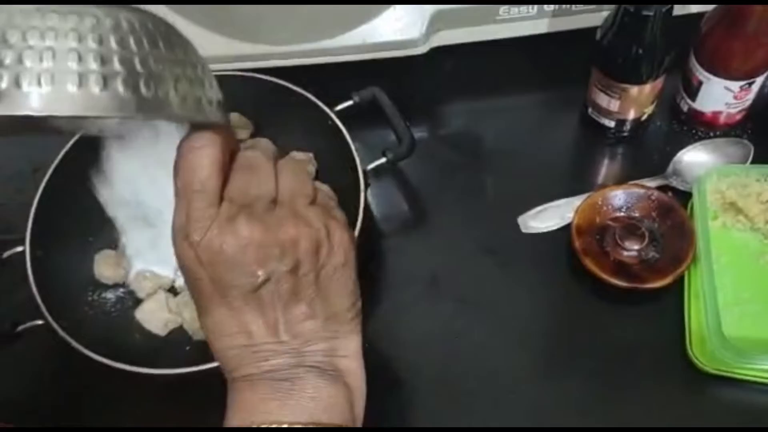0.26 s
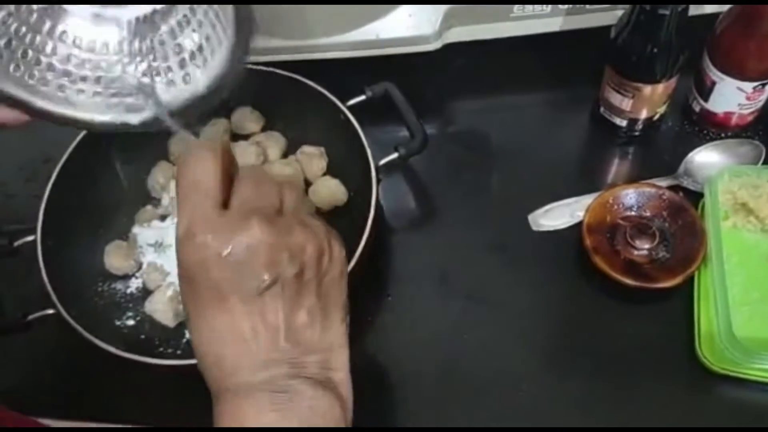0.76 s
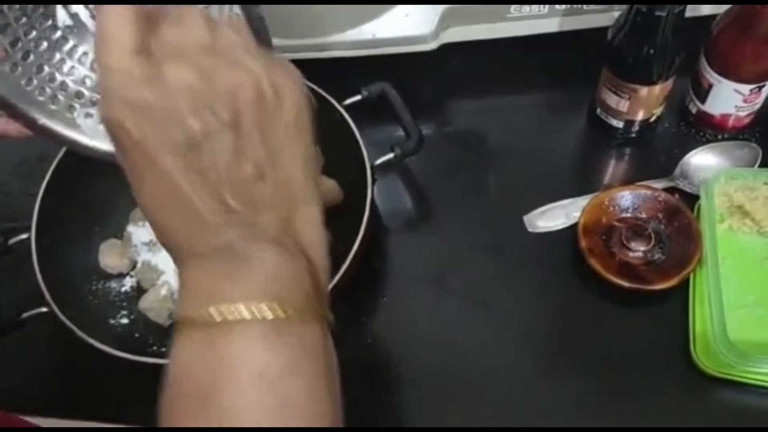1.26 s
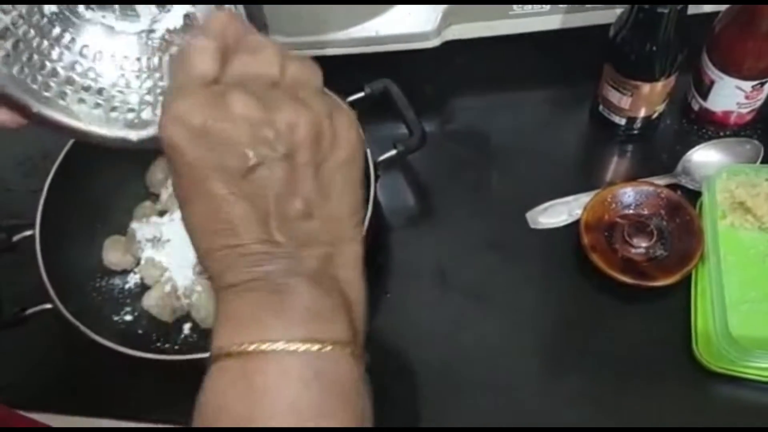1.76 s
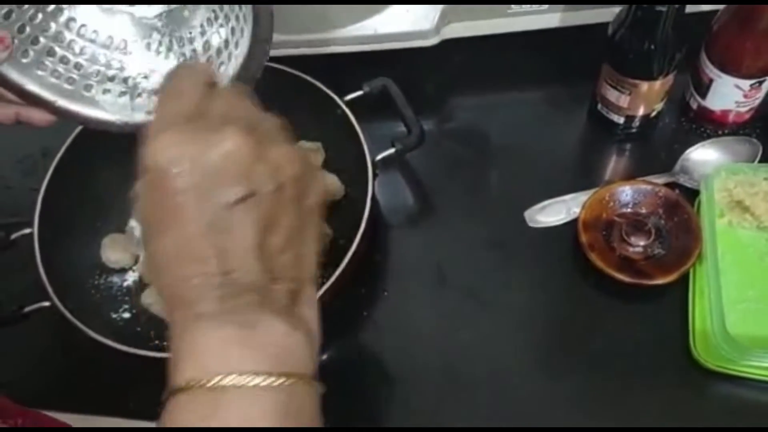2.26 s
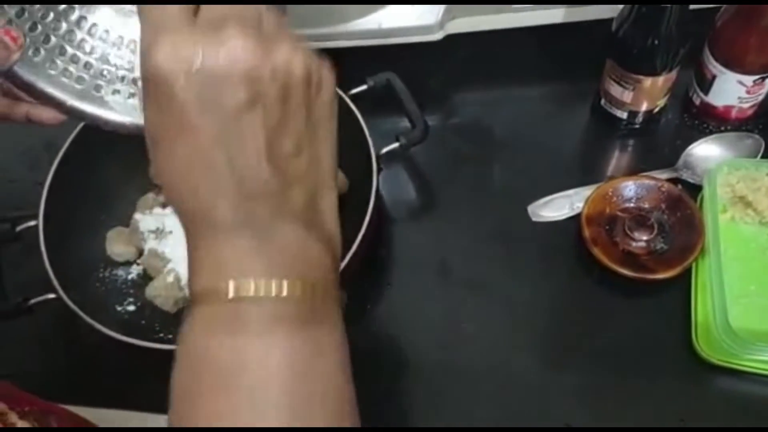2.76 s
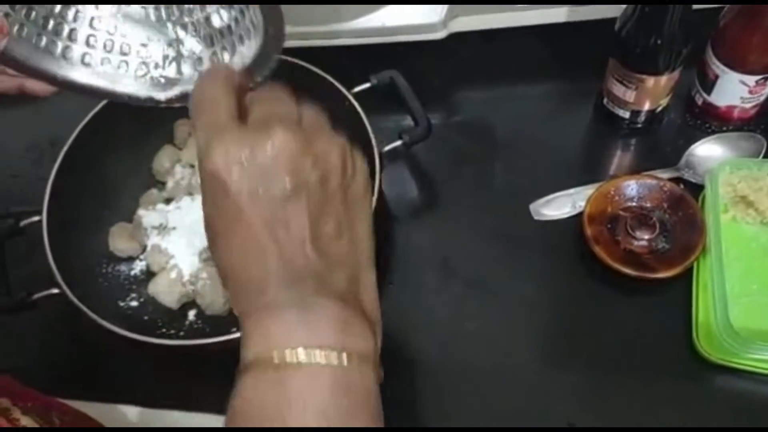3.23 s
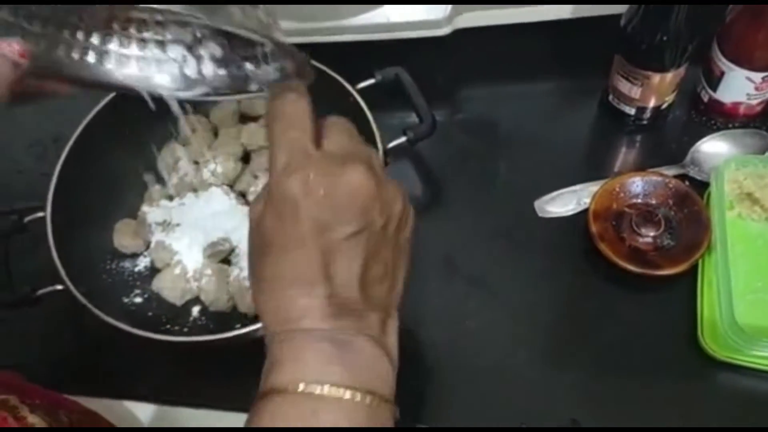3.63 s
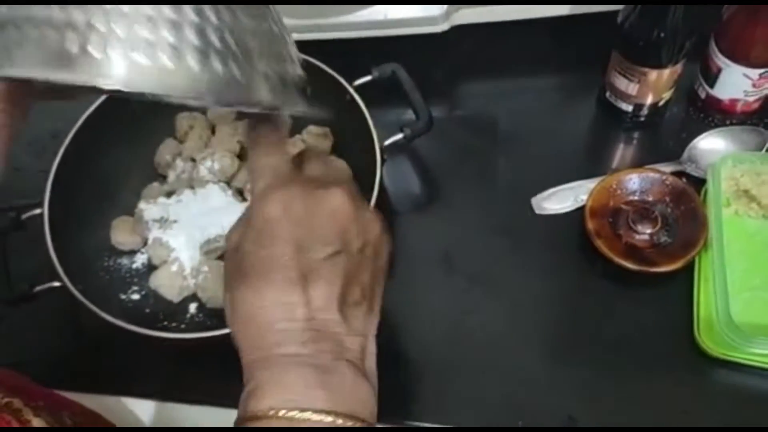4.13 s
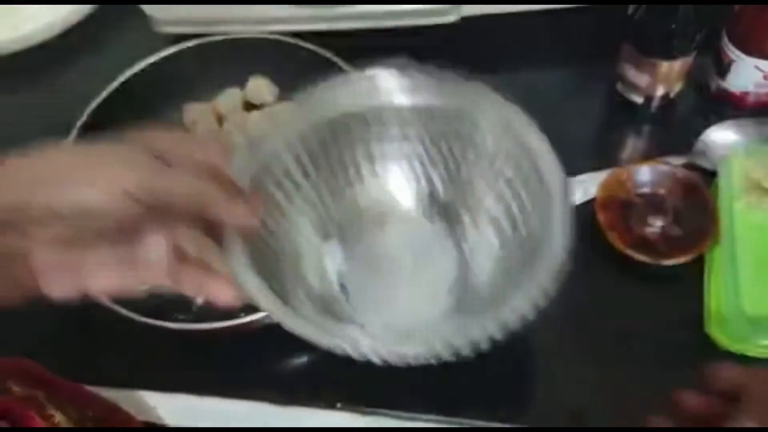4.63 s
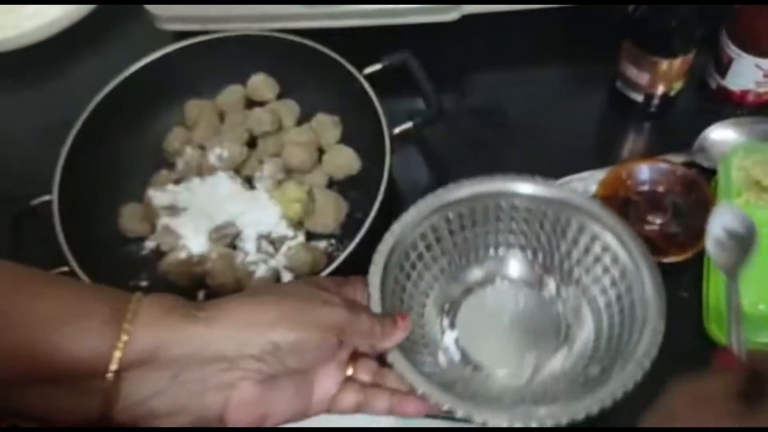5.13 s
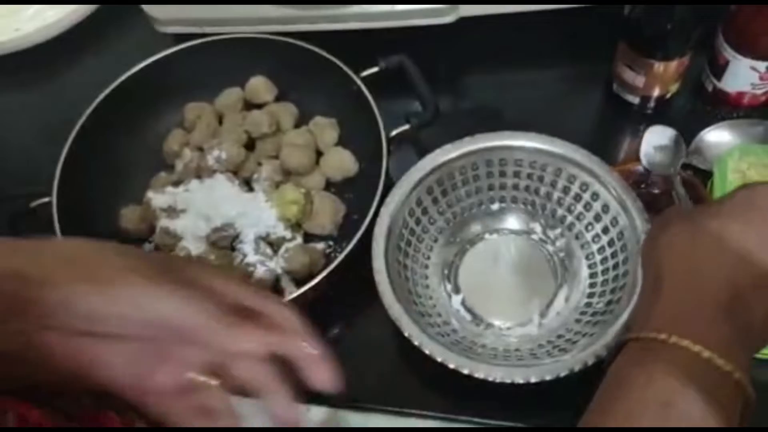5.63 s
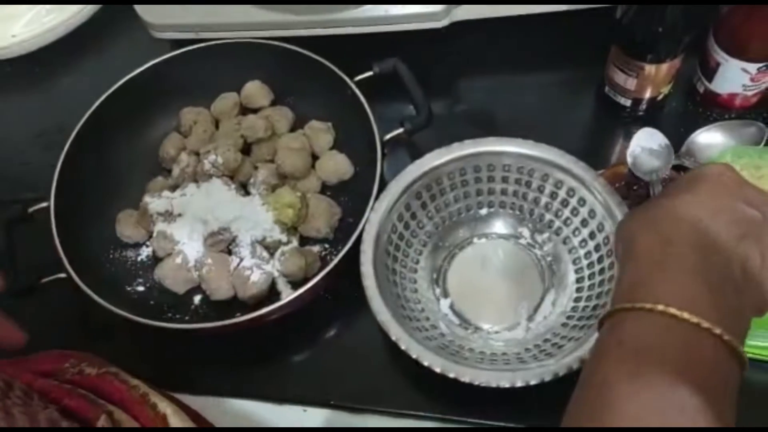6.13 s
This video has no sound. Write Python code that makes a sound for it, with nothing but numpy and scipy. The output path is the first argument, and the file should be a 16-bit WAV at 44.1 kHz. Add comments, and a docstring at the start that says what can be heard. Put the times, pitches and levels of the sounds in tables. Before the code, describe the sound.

A close stereo pickup in a small, hard-walled kitchen, with faint noise and a low wavering hum. From 0 to 0.8 seconds, a steel strainer clinks lightly on a pan amid floury, raspy rubbing. A brighter clink comes at 1.06, then soft hollow hand knocks and short scrapes, with a firmer rub near 1.9. The strongest ringing clinks fall at 2.4 and 3.25, with busy tapping and smaller clinks between; another hits at 3.5. Rings are thin, bright and quickly damped. From 3.5 to 4.3, dry wiping strokes dominate. A crisp spoon click sounds at 4.48, then a pause. At 5.09 and 5.15 the strainer hits stone with sharp clanks and quick bounces, rolls with a faint rising metallic scrape, and from 5.42 chatters tightly, settling by about 5.6. Near 6.1, several tiny spoon-on-glass clicks end the quiet.

```python
"""A steel strainer full of holes is tapped and rubbed empty over a pan, its rim clinking on the pan now and then.
Its taps are short wall tones, noise bursts and fading modes; its rubs are many tiny catches that shake the wall.
A spoon clicks on a glass dish, the strainer lands on a stone counter, bounces, rolls and rattles to rest,
and the spoon clicks again: noise bursts and modes too, with rising tones for the roll.
A low wavering hum and quiet noise lie behind; a hard little kitchen adds a short tail of shaped noise."""
import sys
import numpy as np
from scipy import signal
from scipy.fft import rfft, irfft, next_fast_len
from scipy.io import wavfile

SR = 44100
rng = np.random.default_rng(int(sys.argv[2]) if len(sys.argv) > 2 else 0)


def write(x):
    x = np.atleast_2d(x).T
    wavfile.write(sys.argv[1], SR, np.round(np.clip(x, -1, 1) * 32767).astype(np.int16))


N = 281483
TIME = np.arange(N) / SR  # seconds from the start of the scene
AGE = np.arange(SR) / SR  # seconds since a blow

# A t60 is the time in seconds that a sound takes to fade by 60 dB.
# Background noise. Each row: frequency in Hz, level in dB.
FLOOR = [(35, -21.5), (100, -0.5), (165, -16), (255, -0.5), (390, -16.5), (2400, -23.5), (6200, -31.5),
         (8000, -35), (16000, -41)]
# How loud the hum is over time. Each row: time in seconds, level in dB.
HUM = [(0, -55.5), (.5, -48.5), (.9, -59.5), (1.3, -53), (2.05, -51.5), (3.6, -50.5), (3.9, -62.5),
       (6.3, -60)]
# How long the kitchen rings. Each row: frequency in Hz, t60 in seconds.
ROOM_T60 = [(150, 0.86), (500, 0.66), (1100, 0.35), (3000, 0.39), (8000, 0.28), (15000, 0.24)]
# Tone balance of the two channels. Each row: frequency in Hz, left minus right in dB.
CHANNEL_BALANCE = [(100, -3.5), (300, 2.5), (1200, -1), (8000, -3.5), (12500, 1)]

# Spoon clicks. Each row: start in seconds, then the clack, the tick, the spoon's ring and the dish's ring
# as relative levels in dB, then left minus right in dB.
SPOON_CLICKS = [(4.479, -23.5, -10, -30, -35.5, -2.5), (6.0804, -25, -42, -58, -30, -4.5),
                (6.102, -29, -58, -60, -36.5, 1), (6.1127, -33, -59, -59, -38, 0)]
# The spoon's modes. Each row: frequency in Hz, level in dB, t60 in seconds when held loosely.
SPOON = [(1850, -0.5, 0.29), (2625, 0.5, 0.39), (3066, -10.5, 0.45), (4256, -9, 0.72)]
# The glass dish's modes. Each row: frequency in Hz, level in dB, t60 in seconds.
DISH = [(1296, -11.5, 0.039), (2020, 1, .1), (3120, -0.5, 0.12), (3170, -23.5, 0.61), (4580, -11, 0.078),
        (5800, -15, 0.117), (6760, -13.5, 0.094)]
# Colours of the spoon's contact. Each row: frequency in Hz, level in dB.
SPOON_CLACK = [(200, -11), (600, -7.5), (1000, -1), (1400, -2.5), (1950, 2), (2500, -4.5), (3200, -4.5),
               (4000, -16), (7000, -20.5)]
SPOON_TICK = [(3000, -2.5), (7000, -6), (10000, 7), (14000, 1), (16000, -17)]

# Colours of the strainer's contacts. Each row: frequency in Hz, level in dB.
KNOCK_SPREAD = [(100, -35), (300, -38), (520, -5.5), (700, -20.5), (900, 2.5), (1150, 11), (1350, -15),
                (2500, -31.5)]
CLACK = [(600, -18), (1400, -15), (1850, 0), (2400, -4), (3200, -4), (3900, -11), (4400, -6.5),
         (5100, -16.5), (7000, -10.5)]
TICK = [(2500, -29), (4500, -12.5), (6200, -13.5), (7000, -2.5), (8200, 1), (11000, 0), (13000, -6.5),
        (16000, -25)]
RASP = [(1400, -17.5), (2000, -0.5), (2800, -15.5), (3400, -4), (4700, -15.5), (6200, -10.5), (7000, -1.5),
        (8200, 0), (10200, -5), (13000, -8.5), (16000, -11.5)]
THUD = [(90, -19.5), (170, -14), (330, -7.5), (650, -6.5), (900, -2), (1200, 2), (1600, -4.5),
        (2500, -16.5)]
PAN_THUD = [(300, -33), (400, -16.5), (520, 1.5), (660, -3.5), (900, 5.5), (1300, -31)]
STONE_TICK = [(4000, -16.5), (6600, -0.5), (8500, 5.5), (10500, -15), (15000, -26)]

# Blows of the base on the counter. Each row: start in seconds, strength in dB, relative ring level in dB,
# place struck, favoured mode in Hz.
LANDING = [(5.0868, -14.5, -20.5, "base", 2616), (5.1466, -13, -23, "edge", 3262),
           (5.1726, -16.5, -25, "edge", 2616), (5.1889, -22, -32, "base", 2616),
           (5.417, -25, -24, "base", 3270), (5.428, -27, -19.5, "base", 1075),
           (5.4685, -24.5, -21.5, "base", 4290), (5.474, -23, -22, "base", 2020),
           (5.4865, -19, -23, "base", 4140), (5.4981, -19, -27, "base", 2647),
           (5.5183, -19, -27, "base", 1616), (5.5268, -22, -33, "base", 2606)]
# The strainer's modes with its base on the stone. Each row: frequency in Hz, level in dB, t60 in seconds.
SEATED = [(182.5, -19.5, 0.46), (318, -17, .32), (1075, 0, 0.11), (1616, 3, 0.11), (1715, -7, .3),
          (2020, -0.5, 0.19), (2606, 0.5, .23), (2647, 0.5, 0.19), (3270, 1, .09), (4140, 0.5, 0.078),
          (4290, -6, 0.053), (6500, -12, 0.17)]
# The base rolls on the stone. One row: start, fully rolling and end, all in seconds.
ROLL_S = (5.19, 5.28, 5.42)

# The strainer's modes. Each row: frequency in Hz, t60 in seconds when ringing freely, then the level in dB
# when struck on the rim, flank, lip, edge and base.
BOWL = [(1152, .4, -14, -13, -3, -6, -14), (1515, .4, -38, -18, -21, -20, -4),
        (1594, .3, -34, -26, -30, -12, -11), (1637, .5, -16, -5, -17, -8, -3),
        (1790, .25, -11, -36, -6, -10, -17), (1827, .3, -11, -26, -10, -12, -1),
        (2042, .65, -19, -4, 1, -7, -22), (2251, .65, -33, -16, 1, -17, -16),
        (2616, .45, -1, -11, -3, -6, -3), (3003, .65, -1, -17, -11, -8, -17),
        (3041, .5, -8, -11, -19, -6, -11), (3068, .55, -12, -23, -13, -8, -23),
        (3262, .3, -14, -2, -24, -6, -3), (4037, .45, -7, -21, -19, -15, -32),
        (4153, .5, -26, -29, -10, -12, -34), (4213, .4, -15, -10, -27, -7, 0),
        (4419, .42, -13, -22, -21, -21, -40), (5310, .4, -20, -18, -33, -17, -20),
        (5410, .35, -21, -7, -36, -13, -9), (5783, .45, -10, -22, -24, -17, -16),
        (6735, .25, -36, -24, -24, -12, -15)]
# Names of the places struck, in the order of those level columns.
PLACES = ["rim", "flank", "lip", "edge", "base"]
# A firm grip makes the ring both weak and short. Each row: ring level in dB, share of the free decay time.
GRIP = [(-35, 0.94), (-18, 1)]
# How much each new blow damps the old ring: light and middling blows a little, the firmest most.
# Each row: strength in dB, change of the old ring in dB.
CHOKE_DB = [(-31.5, -4), (-19.5, -3), (-11.5, -9)]
# Soft knocks of the hand on the wall. Each row: start in seconds, pitch in Hz, strength in dB, place struck,
# favoured mode in Hz.
KNOCKS = [(0.2341, 1037, -27, "edge", 2616), (0.2547, 1157, -25.5, "edge", 2042),
          (1.1751, 1097, -25.5, "edge", 2042), (1.39, 1010, -30.5, "edge", 2616),
          (1.6158, 1124, -31, "edge", 1637), (1.8802, 1196, -21, "edge", 1637),
          (2.2278, 1102, -24, "edge", 2042), (2.3364, 1145, -28, "edge", 2616),
          (2.5912, 1220, -20, "rim", 3068), (2.65, 1107, -31, "flank", 5410),
          (2.815, 1123, -32, "edge", 2251), (2.917, 1153, -28.5, "edge", 4213),
          (3.086, 1013, -34, "edge", 1637), (3.151, 1142, -26, "edge", 5783),
          (3.2965, 903, -24.5, "lip", 2042)]
# Hard clinks of the rim on the pan. Each row: start in seconds, strength in dB, relative clack level in dB,
# clack pitch in Hz, relative level of the lasting ring in dB, place struck, favoured mode in Hz, its change in dB.
CLINKS = [(0.0417, -23, -16, 1850, -43.5, "lip", 3068, 19.5),
          (0.2192, -42, -31.5, 4100, -43, "edge", 4213, 5),
          (0.4426, -28.5, -32, 1900, -54, "edge", 4153, 19),
          (0.7242, -40.5, -56, 3400, -58.5, "edge", 2042, 22.5),
          (1.0609, -23.5, -19.5, 3150, -26.5, "edge", 3041, -13),
          (1.8376, -26, -28, 1800, -37.5, "edge", 1827, 7.5),
          (1.9349, -38, -27, 2000, -41.5, "edge", 1637, 18.5),
          (2.4134, -12.5, -18.5, 1800, -15.5, "rim", 3003, 2.5),
          (2.7182, -23.5, -17.5, 2300, -16.5, "flank", 3262, -1.5),
          (2.883, -25, -23.5, 3200, -32, "edge", 1637, 13.5),
          (3.256, -12.5, -21.5, 1900, -20, "lip", 2251, -2.5),
          (3.496, -17.5, -22, 1800, -48.5, "edge", 1827, 16),
          (3.7334, -30.5, -43, 1830, -59, "edge", 1827, 8)]
# Strokes over the wall with its holes. Each row: moment of greatest pressure in seconds, length in seconds,
# strength in dB.
STROKES = [(0.143, 0.75, -59.5), (0.25, 0.13, -30.5), (0.514, 0.15, -31), (0.73, 0.071, -35.5),
           (1.156, 0.086, -28), (1.425, 0.072, -41.5), (1.551, 0.026, -45.5), (1.75, 0.74, -46),
           (1.938, 0.08, -23), (2.211, 0.13, -31.5), (2.356, 0.051, -33.5), (2.659, 0.07, -24.5),
           (2.715, 0.046, -23), (2.908, 0.18, -30.5), (3.171, 0.036, -37), (3.287, 0.2, -32),
           (3.57, 0.16, -26.5), (3.804, 0.15, -28.5), (4.052, 0.17, -31.5), (4.127, 0.026, -30),
           (4.251, 0.19, -31.5)]
# How much a stroke shakes the wall, most while the flour is pushed out and least in the last light wipes.
# Each row: time in seconds, level over the rasp in dB.
SHAKE = [(0.26, 3.5), (0.5, -6), (1.9, -7), (3.6, -2.5), (4.25, -21.5)]

SEATED_FROM_S = 5.3  # later blows find the strainer laid flat
# What a blow on stone is made of: thud, clack and tick, in dB over its strength.
TILTED, FLAT = (4.4, -13.5, -12), (0.52, 0.84, -4)
SETTLE_START_S, SETTLE_FADE_S, SETTLE_T60 = 5.42, 5.535, 0.094  # the chatter starts, lets up, and its fade time
WALL_HZ, WALL_SAG_HZ = 1156, 674  # pitch of the wall under a light clink, and its drop under a blow of 0 dB
WALL_T60 = 0.06  # seconds
STROKE_RISE = 0.57  # share of a stroke spent pressing harder; the rest lets go
TOP_HZ = 16200  # nothing much is heard above this


def undb(db):
    """Turn decibels into a gain."""
    return 10 ** (np.asarray(db) / 20)


def unit(x):
    """Scale a sound to an average (rms) level of 1."""
    return x / np.sqrt(np.mean(x ** 2))


def fade(t60):
    """Fade away smoothly after a blow, by 60 dB every t60 seconds."""
    return np.exp(-np.log(1000) * AGE / t60)


def panned(x, pan_db):
    """Share a sound between left and right, keeping its power."""
    sides = undb(np.array([[pan_db], [-pan_db]]) / 2)
    return x * sides / np.sqrt((undb(pan_db) + undb(-pan_db)) / 2)


def add(out, s, x):
    """Mix a sound in at time s, in seconds."""
    i = int(s * SR)
    out[:, i:i + x.shape[1]] += x[:, :N - i]


def colour(x, points):
    """Filter a sound by rows of Hz and dB, falling away outside them."""
    size = next_fast_len(x.shape[-1])
    hz, db = np.transpose(points)
    f = np.maximum(np.fft.rfftfreq(size, 1 / SR), 1)
    outside = np.minimum(f / hz[0], 1) ** 2 * np.minimum(hz[-1] / f, 1) ** 2
    gain = outside * undb(np.interp(np.log(f), np.log(hz), db))
    return irfft(rfft(x, size) * gain, size)[..., :x.shape[-1]]


def noise(points, size, apart_hz=1500):
    """Coloured noise in two channels: alike in the bass, unrelated in the treble."""
    mid, side = rng.standard_normal((2, size))
    side = signal.sosfilt(signal.butter(1, apart_hz, "high", fs=SR, output="sos"), side)
    return unit(colour(np.array([mid + side, mid - side]), points))


def burst(points, db, t60, rise_s=0.0014):
    """Fading noise stands for the crowd of short-lived resonances that a contact excites."""
    size = len(AGE) // 3
    attack = 1 - np.exp(-AGE[:size] / rise_s)
    crowd = noise(points, size) * undb(db) * fade(t60)[:size] * attack
    return np.pad(crowd, [(0, 0), (0, len(AGE) - size)])


def ring(hz, db, t60, detune=0.00095, apart_hz=2200, sway=1):
    """Fading sine modes; the higher ones tend to reach the two channels further out of step."""
    hz = hz * (1 + detune * rng.standard_normal(len(hz)))
    start = rng.uniform(0, 2 * np.pi, len(hz))
    lead = rng.standard_normal(len(hz)) * np.minimum(hz / apart_hz, 2) / 2
    turn = (2 * np.pi * hz[:, None] * AGE + start[:, None]).astype(np.float32)
    size = (undb(db)[:, None] * fade(t60[:, None]) * sway).astype(np.float32)
    mid = np.einsum("m,mt->t", np.cos(lead), size * np.sin(turn))
    side = np.einsum("m,mt->t", np.sin(lead), size * np.cos(turn))
    return np.array([mid + side, mid - side])


def resonate(x, response):
    """Drive a two-channel resonator with a sound, evening out the resonator's power."""
    even = response / np.sqrt(np.sum(response ** 2) / 2)
    return signal.fftconvolve(np.atleast_2d(x), even, axes=1)[:, :N]


def slips(rate, scatter_db):
    """Tiny catches at random moments (rate per second), a few much stronger than the rest."""
    happens = rng.random(N) < rate / SR
    kick = rng.standard_normal(N)
    strength = undb(scatter_db * np.minimum(rng.exponential(size=N), 4))
    return unit(happens * kick * strength)


def choke(rings, s, db):
    """A contact at time s damps whatever is still ringing, within 20 ms."""
    return rings * np.interp(TIME, [s, s + .02], [1, undb(db)])


def favour(hz, lead_hz, lead_db, scatter_db=1.5):
    """No two blows land alike: one mode changes by lead_db, and all vary a little; gives dB."""
    nearest = np.arange(len(hz)) == np.argmin(abs(hz - lead_hz))
    return lead_db * nearest + scatter_db * rng.standard_normal(len(hz))


def background(floor_db=-62, hum_hz=110, waver=0.1004, waver_rate=1.7, hum_db=-3, murk_db=-3):
    """Quiet room noise, and a low hum with murky noise; the hum's pitch wavers a few times a second."""
    drift = unit(colour(rng.standard_normal(N), [(1, 1.5), (4, 1), (8, -25.0)]))
    pitch = hum_hz * (1 + waver * (np.sin(2 * np.pi * waver_rate * TIME) + drift / 2))
    tone = undb(hum_db) * unit(np.sin(2 * np.pi * np.cumsum(pitch) / SR))
    murk_colour = [(45, -15.0), (63, -8.5), (78, -15.5), (104, 0.0), (122, -9.5), (150, -16.5)]
    murk = undb(murk_db) * noise(murk_colour, N)
    hum = undb(np.interp(TIME, *np.transpose(HUM))) * (tone + murk)
    return hum + undb(floor_db) * noise(FLOOR, N, apart_hz=800)


def kitchen(x, wet_db=-6, build_s=0.0021,
            tone=((100, -2), (1100, 0), (3000, -3), (8000, 0), (16000, -1))):
    """Close hard walls give a dense tail that dies sooner in the treble."""
    f, s, cells = signal.stft(noise(tone, len(AGE), apart_hz=700), SR, nperseg=256)
    hz, t60 = np.transpose(ROOM_T60)
    decay = np.exp(-np.log(1000) * s / np.interp(f, hz, t60)[:, None])
    tail = signal.istft(cells * decay, SR)[1][:, :len(AGE)]
    tail = tail * (1 - np.exp(-AGE / build_s))
    return undb(wet_db) * resonate(x, tail)


def spoon(clack_db=2, clack_t60=0.069, tick_db=2, tick_t60=0.039, hold=0.87):
    """Light, hard clicks on a glass dish, with a faint ring from both; the hold shortens the spoon's."""
    out = np.zeros((2, N))
    hz, db, t60 = np.transpose(SPOON)
    for s, clack, tick, ringing, dish, pan in SPOON_CLICKS:
        contact = burst(SPOON_CLACK, clack + clack_db, clack_t60)
        contact = contact + burst(SPOON_TICK, tick + tick_db, tick_t60)
        spoon_ring = undb(ringing) * ring(hz, db, t60 * hold)
        dish_ring = undb(dish) * ring(*np.transpose(DISH), detune=0.0015)
        add(out, s, panned(contact + spoon_ring + dish_ring, pan))
    return out


def slide(sing_db=-40, rise=0.06, scrape_db=-46, scrape_rate=900, rattle_db=-29, rattle_rate=260):
    """As the base rolls on the stone it scrapes and two modes sing and rise; then it chatters to rest."""
    rolling = np.interp(TIME, ROLL_S, [0, 1, 1], right=0)
    stiffening = 1 + rise * np.interp(TIME, [ROLL_S[0], ROLL_S[-1]], [0, 1])
    singing = 0
    for hz, db in [(3300, 0), (4300, -7.5)]:
        shiver = unit(colour(rng.standard_normal(N), [(10, 0), (45, 0), (450, -29)]))
        tone = unit(np.sin(2 * np.pi * np.cumsum(hz * stiffening) / SR))
        singing = singing + undb(db) * shiver * tone
    let_up = np.exp(-np.log(1000) * np.maximum(TIME - SETTLE_FADE_S, 0) / SETTLE_T60)
    settling = (TIME >= SETTLE_START_S) * let_up
    scrape = undb(scrape_db) * slips(scrape_rate, 1.5) * rolling
    rattle = undb(rattle_db) * slips(rattle_rate, 1.4) * settling
    chatter = burst(THUD, 0, 0.028) + burst(CLACK, 0, 0.018) + burst(STONE_TICK, 0.85, 0.01)
    return panned(undb(sing_db) * singing * rolling + resonate(scrape + rattle, chatter), -2.5)


def seated_ring(lead_hz, lead_db):
    """The strainer lying on the stone: each blow shifts its modes slightly."""
    hz, db, t60 = np.transpose(SEATED)
    return ring(hz, db + favour(hz, lead_hz, lead_db), t60, detune=0.0059)


def bowl_ring(place, hold=1, lead_hz=0, lead_db=0, flutter_db=4.5, flutter_rate=45):
    """The place of contact decides which strainer modes speak; a firm hold (under 1) shortens them."""
    hz, t60, *by_place = np.transpose(BOWL)
    db = by_place[PLACES.index(place)] + favour(hz, lead_hz, lead_db)
    # each mode's level flutters on its own
    steps = rng.standard_normal((len(hz), 256))
    flutter = [np.interp(AGE * flutter_rate, np.arange(len(row)), undb(flutter_db * row)) for row in steps]
    return ring(hz, db, t60 * hold, sway=np.array(flutter))


def landing(thud_t60=0.044, clack_t60=0.057, tick_t60=0.053, free_db=1, hold=0.83, seated_db=0, lead_db=6,
            tilted_choke_db=-5, flat_choke_db=-2, pan_db=-7):
    """The base rings freely while tilted on the stone; laid flat, it rattles with its seated modes."""
    out, rings = np.zeros((2, 2, N))
    for s, db, ringing, place, lead_hz in LANDING:
        tilted = s < SEATED_FROM_S
        thud, clack, tick = db + np.array(TILTED if tilted else FLAT)
        if tilted:
            modes = undb(free_db) * bowl_ring(place, hold, lead_hz, lead_db)
        else:
            modes = undb(seated_db) * seated_ring(lead_hz, lead_db)
        contact = burst(CLACK, clack, clack_t60) + burst(STONE_TICK, tick, tick_t60)
        add(out, s, panned(contact, pan_db) + panned(burst(THUD, thud, thud_t60), 0.5))
        rings = choke(rings, s, tilted_choke_db if tilted else flat_choke_db)
        add(rings, s, undb(ringing) * modes)
    return out + panned(rings, pan_db)


def clack_at(hz, db, t60, focus_db=-2, broad_db=-4):
    """A clack whose energy gathers round a pitch set by the point of contact."""
    focus = [(hz * .8, -22), (hz, 0), (hz * 1.25, -22)]
    return burst(focus, db + focus_db, t60) + burst(CLACK, db + broad_db, t60)


def wall_knock(hz, db, tone_db=6, spread_db=-3, spread_t60=0.057,
               pan_thud_db=3, pan_thud_t60=0.35, firmness=2.46):
    """A few cycles of the hand-damped wall; it takes a firm blow to move the heavy pan much."""
    tone = undb(db + tone_db) * np.sin(2 * np.pi * hz * AGE) * fade(WALL_T60)
    wall = tone + burst(KNOCK_SPREAD, db + spread_db, spread_t60)
    return wall + burst(PAN_THUD, firmness * db + pan_thud_db, pan_thud_t60)


def knocks(clack_db=-3, clack_t60=0.066, overtone=2.05, tick_db=-17, tick_t60=0.025,
           bump_db=2, bump_t60=0.027, ring_db=-18, lead_db=9):
    """Soft blows are mostly wall: a brief bump, a clack about an octave above it, little tick."""
    blows = []
    for s, hz, db, place, lead_hz in KNOCKS:
        contact = clack_at(overtone * hz, db + clack_db, clack_t60) + burst(TICK, db + tick_db, tick_t60)
        bump = burst(KNOCK_SPREAD, db + bump_db, bump_t60)
        sound = wall_knock(hz, db) + bump + contact
        blows.append((s, db, sound, db + ring_db, place, lead_hz, lead_db))
    return blows


def clinks(wall_db=-1.0, clack_db=2, clack_t60=0.08, tick_db=1.5, tick_t60=0.039):
    """Steel on steel adds a loud clack and a bright tick, and the wall sounds lower under firmer blows."""
    blows = []
    for s, db, clack, clack_hz, *ringing in CLINKS:
        contact = clack_at(clack_hz, clack + clack_db, clack_t60) + burst(TICK, db + tick_db, tick_t60)
        wall_hz = WALL_HZ - WALL_SAG_HZ * undb(db)
        blows.append((s, db, wall_knock(wall_hz, db + wall_db) + contact, *ringing))
    return blows


def taps(ring_db=-1):
    """Knocks and clinks in turn, each choking the last ring and leaving its own."""
    out, rings = np.zeros((2, 2, N))
    blows = sorted(knocks() + clinks(), key=lambda blow: blow[0])
    for s, db, sound, ringing, place, lead_hz, lead_db in blows:
        add(out, s, sound)
        rings = choke(rings, s, np.interp(db, *np.transpose(CHOKE_DB)))
        hold = np.interp(ringing + lead_db, *np.transpose(GRIP))
        add(rings, s, undb(ringing + ring_db) * bowl_ring(place, hold, lead_hz, lead_db))
    return out + rings


def grains(t60, scatter_db, count=45000, size=200):
    """Each catch on a hole rings for a few milliseconds (size samples) at a pitch of its own."""
    when, pitch, lead, chance = rng.random((count, 4), dtype=np.float32).T
    shape = undb(-scatter_db * np.log(1 - chance))[:, None] * fade(t60)[:size]
    turn = 2 * np.pi * (1300 + 15000 * pitch[:, None]) * AGE[:size].astype(np.float32)
    at = ((when * N).astype(int)[:, None] + np.arange(size)).ravel()
    # the right channel starts each wave at its own point
    shifts = (0, 2 * np.pi * lead[:, None])
    return np.array([np.bincount(at, (shape * np.sin(turn + d)).ravel(), N)[:N] for d in shifts])


def rubs(rasp_db=0, body_db=0, ring_db=-13, hold=0.94, swell=1.29, body_hz=1110, tone_db=-2, pan_db=-2):
    """Strokes catch on the floury holes: a dense rasp that also shakes the wall and keeps the ring alive."""
    pressure = np.zeros(N)
    for s, length, db in STROKES:
        corners = [s - STROKE_RISE * length, s, s + (1 - STROKE_RISE) * length]
        pressure += undb(db) * np.interp(TIME, corners, [0, 1, 0]) ** swell
    shaking = pressure * undb(np.interp(TIME, *np.transpose(SHAKE)))
    # the wall's crowded high modes favour some pitches and swallow others
    high_modes = rng.standard_normal((2, len(AGE))) * fade(.025)
    catches = resonate(grains(t60=.014, scatter_db=3.5), high_modes)
    rasping = undb(rasp_db) * pressure * unit(colour(catches, RASP))
    push = slips(2500, 3.7) * shaking
    wall_tone = undb(tone_db) * np.sin(2 * np.pi * body_hz * AGE) * fade(WALL_T60)
    wall = wall_tone + burst(KNOCK_SPREAD, 5.4, 0.076)
    ringing = undb(ring_db) * resonate(push, bowl_ring("edge", hold))
    return panned(rasping + ringing, pan_db) + undb(body_db) * resonate(push, wall)


def scene():
    """Strainer and spoon, straight to the ear and by way of the kitchen walls, over the background."""
    # held in the air, the small open bowl radiates little bass
    bass_cut = signal.butter(2, 380, "high", fs=SR, output="sos")
    held = signal.sosfilt(bass_cut, taps() + rubs())
    close = held + landing() + slide() + spoon()
    return undb(-1.5) * close + kitchen(close) + background()


def record(dry):
    """Give each channel its own colour, cut the rumble, clip at full scale and cut the top."""
    hz, db = np.transpose(CHANNEL_BALANCE)
    balance = np.interp(np.log(np.fft.rfftfreq(N, 1 / SR) + 1), np.log(hz), db)
    heard = irfft(rfft(dry) * undb(np.array([balance, -balance]) / 2), N)
    heard = signal.sosfilt(signal.butter(2, 45, "high", fs=SR, output="sos"), heard)
    top_cut = signal.ellip(10, .2, 80, TOP_HZ, fs=SR, output="sos")
    return signal.sosfilt(top_cut, np.clip(heard, -1, 1))


dry = scene()
out = record(dry)
write(out)
```